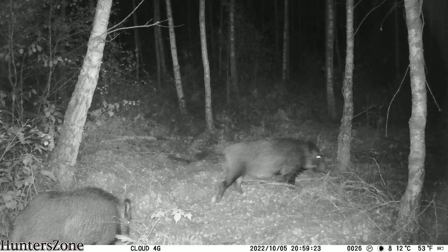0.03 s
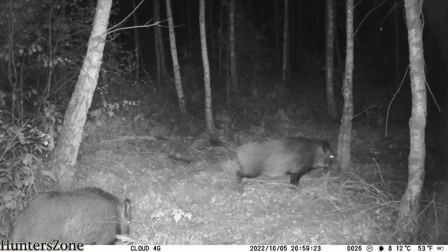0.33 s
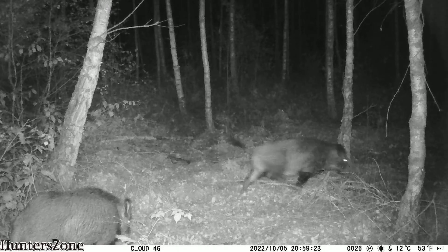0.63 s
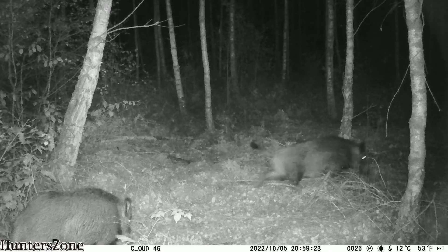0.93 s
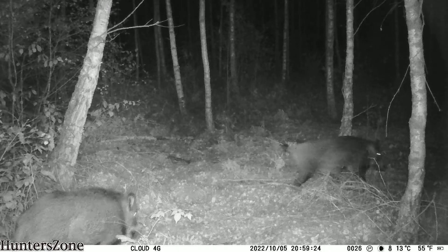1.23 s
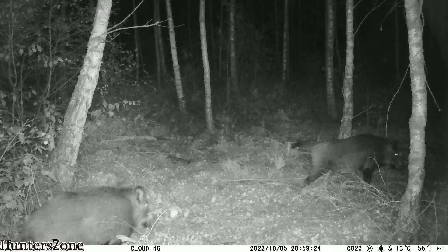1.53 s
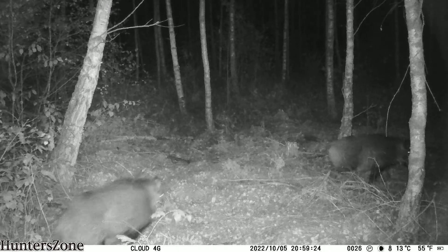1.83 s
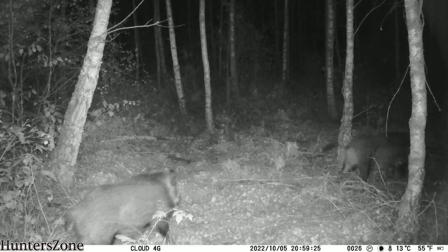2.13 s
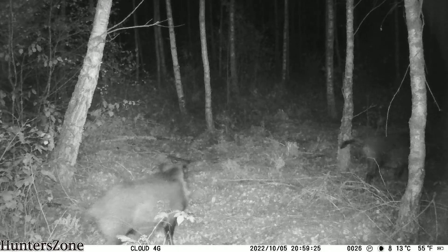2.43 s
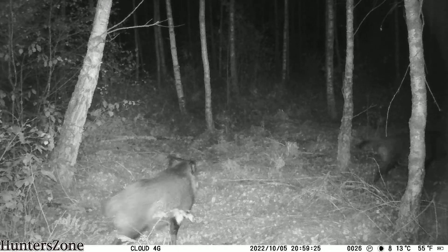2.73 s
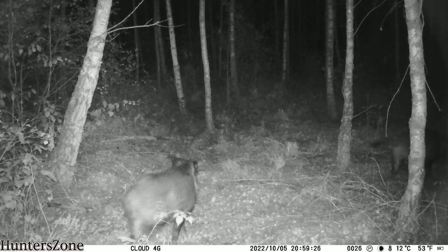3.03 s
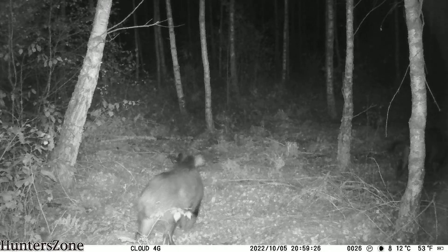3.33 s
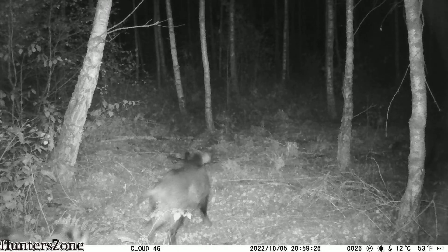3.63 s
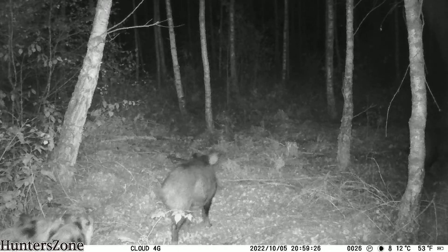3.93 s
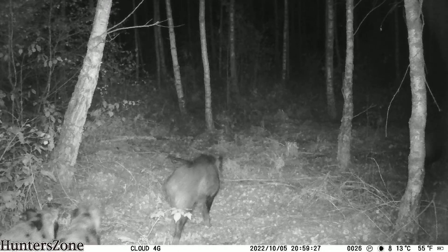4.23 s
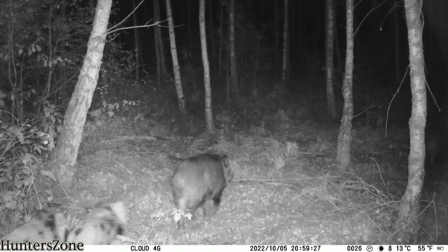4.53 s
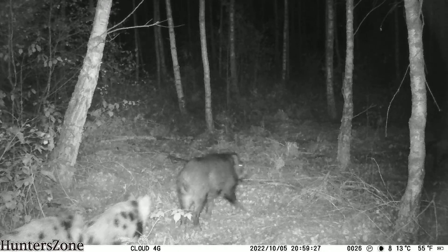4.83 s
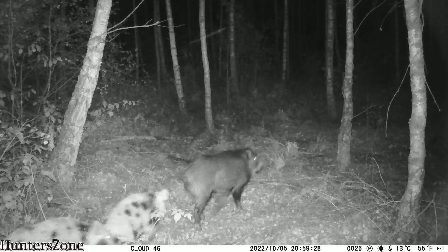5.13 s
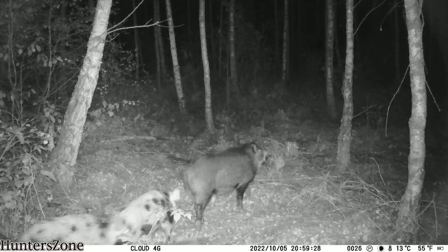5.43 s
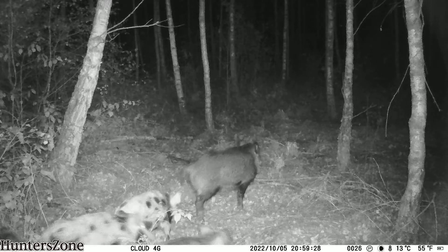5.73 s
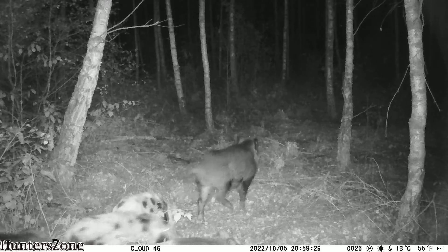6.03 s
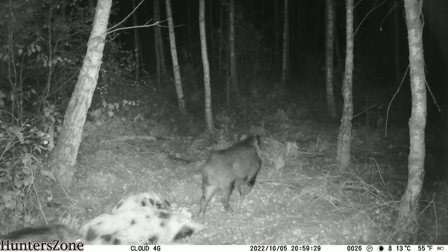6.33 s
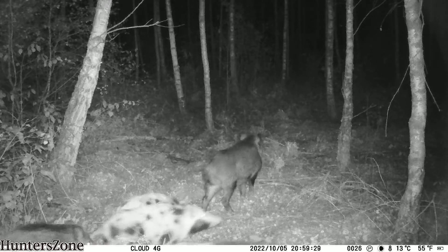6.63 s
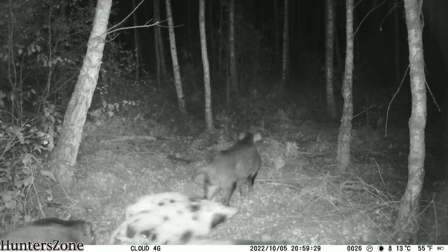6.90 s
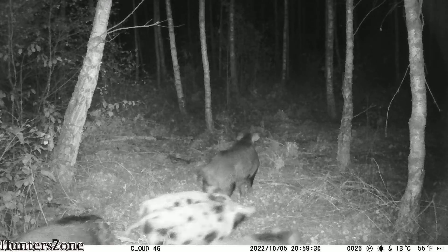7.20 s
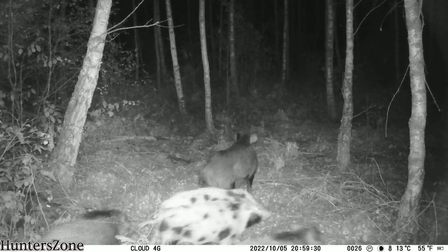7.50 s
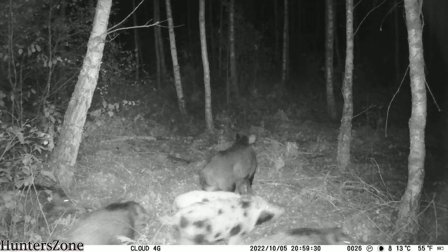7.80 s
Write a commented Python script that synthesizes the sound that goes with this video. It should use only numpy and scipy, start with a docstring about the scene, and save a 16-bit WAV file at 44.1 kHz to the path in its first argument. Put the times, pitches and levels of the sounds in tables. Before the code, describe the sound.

A faint wind rumble and the hush of a wood at night run throughout, with a thin microphone hiss. From the start, wild boars brush through dry litter in short, quiet, crackly rustles over a low murmur of light steps. Dull hoof thuds begin at about 1.2 seconds, and by far the loudest lands in a quick cluster at 1.8 seconds. More follow around 2.6, 3.4 and 4.4 seconds, then only a few soft ones. Twigs start snapping at about 2.3 seconds and continue irregularly, with clearer cracks near 3.4, 5.5 and 6.9 seconds and the sharpest at 7.6 seconds. The light steps thicken again around 8 seconds, with one more soft thud. The whole scene is quiet, heard through a small, dull, slightly hollow microphone close to the animals.

```python
"""A faint wind rumble, the hush of a wood at night, and legs brushing through dry litter: wild boars pass.
The litter crackles as a sum of tiny fractures, twigs snap as impulses that ring in the wood, and hooves
set the springy ground into damped oscillation, heard as low thuds over a murmur of lighter steps.
All of it passes through the resonant housing and the dull, hissy microphone of a small camera close by."""
import sys
import numpy as np
from scipy import signal
from scipy.fft import rfft, irfft
from scipy.io import wavfile

SR = 44100
rng = np.random.default_rng(int(sys.argv[2]) if len(sys.argv) > 2 else 0)


def master(y):
    """Save y as 16-bit WAV."""
    cut = np.clip(np.atleast_2d(y).T, -1, 1)
    pcm = np.round(cut * 32767)  # scale
    wavfile.write(sys.argv[1], SR, pcm.astype(np.int16))


N = 355446


def from_db(db):
    """Amplitude ratio of a level in decibels."""
    return 10 ** (np.asarray(db) / 20)


def rms_one(x):
    """Normalisation to rms 1."""
    return x / np.sqrt(np.mean(x ** 2) + 1e-20)


def seconds():
    """The time of every sample."""
    return np.arange(N) / SR


def coloured(x, spectrum):
    """Spectral shaping, falling 58 dB per octave beyond the ends of the table; rms 1."""
    hz, db = np.transpose(spectrum)
    octave, known = np.log2(np.fft.rfftfreq(N, 1 / SR) + 1), np.log2(hz)
    beyond = np.abs(octave - np.clip(octave, known[0], known[-1]))
    gain = from_db(np.interp(octave, known, db) - 58 * beyond)
    return rms_one(irfft(rfft(x) * gain, N))


def resonance(x, hz, width_hz):
    """A two-pole resonator with unit gain at its peak."""
    r = np.exp(-np.pi * width_hz / SR)
    feedback = [1, -2 * r * np.cos(2 * np.pi * hz / SR), r * r]
    return signal.lfilter(np.array([1, 0, -1]) * (1 - r * r) / 2, feedback, x)


def band(x, low_hz, high_hz):
    """Second-order band-pass."""
    return signal.sosfilt(signal.butter(2, [low_hz, high_hz], "band", fs=SR, output="sos"), x)


def drift(per_s):
    """A random wander of rms 1."""
    knots = np.arange(0, N / SR + 1, 1 / per_s)
    return rms_one(np.interp(seconds(), knots, rng.standard_normal(len(knots))))


def swell(centre_s, half_width_s):
    """A bell-shaped envelope, down to 1/e at its half-width."""
    return np.exp(-np.minimum(((seconds() - centre_s) / half_width_s) ** 2, 50))


def add(out, start_s, sound):
    """Superposition of a sound on out from start_s."""
    start = round(start_s * SR)
    out[start:start + len(sound)] += sound[:N - start]


def crackle(per_s, spread_db, clump_db):
    """Shot noise: tiny fractures are random impulses of uneven size, clumped by a wandering level."""
    sizes = from_db(spread_db * np.minimum(rng.exponential(1, N), 4)) * rng.choice([-1, 1], N)
    return sizes * (rng.random(N) < per_s / SR) * from_db(clump_db * drift(60))


# Spectra of the wind and of the wood's hush: f/Hz, relative level/dB
WIND_SPECTRUM = [(12, -1), (25, 3.5), (36, -6.5), (55, -12), (90, -12.5), (200, -9.5), (300, -34.5)]
HUSH_SPECTRUM = [(150, -29.5), (260, -1.5), (384, -4), (490, -5), (534, -3.5), (761, -4), (829, -2.5),
                 (902, -8), (995, -7), (1250, -5.5), (1850, -9.5), (2040, -10.5), (2910, -16), (3580, -18),
                 (4800, -35.5), (6240, -53.5), (10600, -120)]
def night_air(wind_db=-65, hush_db=-69.5, hiss_db=-84):
    """Stationary noise: wind rumble, the hush of the wood and a thin microphone hiss."""
    rumble, hush, hiss = rng.standard_normal((3, N))
    return (from_db(wind_db) * coloured(rumble, WIND_SPECTRUM)
            + from_db(hush_db) * coloured(hush, HUSH_SPECTRUM)
            + from_db(hiss_db) * rms_one(band(hiss, 5820, 7550)))


# Spectra of scuffed soil, crunching sticks and brushed leaves: f/Hz, relative level/dB
SOIL_SPECTRUM = [(200, 5), (270, -0.5), (360, -1.5), (550, -6.5), (750, -16)]
CRUNCH_SPECTRUM = [(210, -32.5), (350, -6.5), (417, -5.5), (481, -10), (599, -2.5), (698, -12), (928, 3),
                   (1010, -6), (1180, -6.5), (1470, 0), (1850, -4.5), (2510, -10.5), (4800, -28.5),
                   (6240, -59), (10600, -120)]
LEAF_SPECTRUM = [(2590, -49.5), (4400, -25.5), (4750, -21), (6020, -5.5), (7170, 1.5), (7540, 2),
                 (8030, -3), (8500, -15), (8700, -21), (11300, -46), (19100, -120)]
# Legs sweeping the litter: centre t/s, half-width/s, soil level/dB, crunch level/dB, leaf level/dB
LEG_SWEEPS = [(.32, 0.052, -84, -74.5, -77), (0.449, 0.014, -79, -62, -77), (0.996, .06, -80, -65, -79),
              (1.189, 0.022, -71, -59.5, -68.5), (1.485, 0.0046, -72, -67.5, -66),
              (1.576, 0.055, -81, -64.5, -79), (1.77, 0.021, -75, -60, -64.5),
              (2.172, 0.086, -82, -69, -78), (2.31, 0.029, -81, -69, -71.5),
              (2.409, 0.022, -76, -60.5, -71), (2.422, 0.0042, -83, -69, -63.5),
              (2.613, 0.016, -76, -62.5, -69.5), (2.767, 0.081, -76, -71.5, -82),
              (3.058, 0.047, -60.5, -60.5, -71.5), (3.67, 0.021, -72, -60.5, -67),
              (3.724, 0.015, -62.5, -75, -77), (4.08, .012, -58, -83, -90), (4.361, 0.016, -84, -64, -71.5),
              (4.431, 0.014, -71, -54.5, -63), (4.685, 0.028, -71, -63, -84),
              (5.122, 0.024, -81, -60.5, -78.5), (5.58, 0.046, -87, -68, -81),
              (6.166, 0.032, -69, -65.5, -72), (6.325, 0.054, -81, -69.5, -84),
              (6.863, 0.047, -78, -67, -74.5), (7.09, 0.031, -80, -67.5, -69.5),
              (7.882, 0.019, -80, -66, -79), (7.967, 0.01, -61, -64.5, -78)]
def litter(stir_db, mean_crunch_db=-72.5, crunch_db_per_db=0.39, leaf_offset_db=-2):
    """Incoherent sources add in power: each leg scuffs soil, crunches sticks and brushes dry leaves."""
    crunch_db = mean_crunch_db + crunch_db_per_db * (stir_db - stir_db.mean())
    powers = [np.zeros(N), from_db(crunch_db) ** 2, from_db(stir_db + leaf_offset_db) ** 2]
    for centre_s, half_width_s, *levels_db in LEG_SWEEPS:
        stroke = swell(centre_s, half_width_s)
        powers = [power + stroke * from_db(db) ** 2 for power, db in zip(powers, levels_db)]
    soil = coloured(crackle(per_s=2000, spread_db=6.0, clump_db=3.0), SOIL_SPECTRUM)
    sticks = coloured(crackle(per_s=2600, spread_db=3.0, clump_db=2.16), CRUNCH_SPECTRUM)
    leaves = coloured(crackle(per_s=2200, spread_db=2.5, clump_db=2.5), LEAF_SPECTRUM)
    return sum(np.sqrt(power) * grains for power, grains in zip(powers, (soil, sticks, leaves)))


# Spectrum of the ground under light steps: f/Hz, relative level/dB
TREAD_SPECTRUM = [(32, -34), (55, -3.5), (81, 1), (125, -1), (146, -8), (173, 0.5), (195, -4), (217, -14),
                  (259, -25), (388, -23.5), (450, -31), (580, -56.5), (990, -120)]
def light_treads(tread_db, offset_db=1, lag_s=0.038, half_width_s=0.032, over_crunch_db=2):
    """Overlapping impacts merge into a low murmur, which swells as each leg lands after its sweep."""
    landing_power = sum(from_db(crunch_db + over_crunch_db) ** 2 * swell(sweep_s + lag_s, half_width_s)
                        for sweep_s, _, _, crunch_db, _ in LEG_SWEEPS)
    murmur = coloured(crackle(per_s=300, spread_db=0.5, clump_db=2.5), TREAD_SPECTRUM)
    return np.sqrt(from_db(tread_db + offset_db) ** 2 + landing_power) * murmur


def small_cracks(stir_db, per_s=14, impulse_db=-43, spread_db=1.5, brittle_db=-2):
    """A random point process: thin sticks give way at a rate that rises as the litter is stirred."""
    breaks = rng.random(N) < per_s * from_db(stir_db - stir_db.mean()) / SR
    clicks = breaks * from_db(impulse_db + spread_db * np.minimum(rng.exponential(1, N), 3)) + 1e-18
    brittle = band(band(clicks, 6000, 8300), 6000, 8300)
    return band(clicks, 1100, 3000) + from_db(brittle_db) * brittle


# Snapping twigs: t/s, peak level/dB, resonance f/Hz, bandwidth/Hz, treble level/dB relative to the wood
TWIG_SNAPS = [(2.303, -50, 1300, 900, -12), (2.357, -52, 1500, 1000, -4), (2.389, -45, 2190, 900, -18),
              (3.427, -39, 1800, 1100, -18), (3.644, -49, 1450, 400, -12), (3.709, -46.5, 1750, 700, -14),
              (3.759, -53.5, 1300, 900, -22), (3.859, -48, 3350, 300, 5), (4.135, -55, 1700, 900, -12),
              (4.185, -49.5, 1490, 700, -11), (4.914, -55.5, 1600, 900, -9),
              (5.037, -48.5, 1500, 1100, -17), (5.051, -44.5, 1400, 500, -9.5),
              (5.382, -54, 2280, 1600, -20), (5.502, -39, 1820, 1680, -12), (5.778, -49, 2150, 1000, -24),
              (5.934, -44.5, 1610, 347, -30), (6.194, -47, 1550, 700, -20), (6.436, -49, 3030, 900, -12),
              (6.903, -42, 1440, 595, -26), (6.918, -48, 1470, 900, -20), (7.537, -55, 1300, 900, -18),
              (7.611, -34.5, 2320, 600, -12)]
def twigs(split_s=0.0017, splinter=0.099, scatter_db=-33, scatter_s=0.016, knock_hz=860, knock_s=0.0041):
    """Brittle fracture: an impulse and splinters ring the wood; trunks and litter scatter a short tail."""
    out, t = np.zeros(N), np.arange(SR // 10) / SR
    knock = np.sin(2 * np.pi * knock_hz * t) * (2 * t / knock_s) * np.exp(1 - 2 * t / knock_s)
    decay = splinter * np.exp(-t / split_s) + from_db(scatter_db) * np.exp(-t / scatter_s)
    for start_s, db, hz, width_hz, treble_db in TWIG_SNAPS:
        force = rng.standard_normal(len(t)) * decay
        force[0] += 1  # the break itself
        wood = band(resonance(force, hz, width_hz), 1100, 3060)
        edge = band(band(force, 5860, 8060), 5860, 8060)
        crack = wood / np.abs(wood).max() + from_db(treble_db) * edge / np.abs(edge).max()
        # thicker twigs sound lower and give more hollow knock, 16 dB per octave
        knock_db = -11 - 16 * np.log2(hz / 1420)
        crack += from_db(knock_db) * knock
        add(out, start_s, from_db(db) * crack / np.abs(crack).max())
    return out


# Overtones of the ground: frequency ratio to the fundamental, relative level/dB
GROUND_MODES = [(1.449, -21.5), (2.05, -19.5), (3.2, -29.5)]
# Heavy hoof falls: t/s, level/dB, ground fundamental f/Hz, hold time/s
HOOF_THUDS = [(1.189, -39, 143, .019), (1.210, -44, 181, 0.03), (1.256, -52, 177, 0.024),
              (1.732, -36.5, 182, 0.035), (1.804, -21.5, 178.6, 0.034), (1.848, -34.5, 183, 0.031),
              (2.172, -50, 218, 0.025), (2.22, -45, 113, 0.011), (2.354, -46, 126, 0.023),
              (2.385, -47, 109.6, .067), (2.612, -34.5, 159, 0.029), (2.642, -38, 162, 0.023),
              (3.105, -48.5, 189, 0.042), (3.14, -49.5, 123, 0.033), (3.44, -41.5, 167, 0.029),
              (3.466, -47, 99, .057), (3.72, -54, 149, 0.03), (3.97, -53.5, 114, 0.057),
              (4.212, -54, 174, 0.063), (4.433, -45.5, 163, .019), (4.455, -42.5, 121, 0.048),
              (5.106, -48, 117, 0.033), (5.44, -52, 129, 0.039), (6.895, -51.5, 158, 0.069),
              (7.968, -48.5, 181, 0.083)]
def hoof_falls(sag=0.081, settle_s=0.012, rise_share=0.25, steepness=2.8,
               tail_db=-24, tail_s=0.053, soften=0.38, grit_s=0.02):
    """Damped oscillation of a stiffening spring: the ground's pitch rises as it takes a hoof's weight."""
    out, t = np.zeros(N), np.arange(SR // 4) / SR
    median_db = np.median(np.array(HOOF_THUDS)[:, 1])
    for start_s, db, hz, hold_s in HOOF_THUDS:
        rise = np.sin(np.pi / 2 * np.minimum(t / (rise_share * hold_s), 1)) ** 2
        load = rise * np.exp(-(t / hold_s) ** steepness)
        pitch_hz = hz * (1 - sag * np.exp(-t / settle_s))
        swing = load * np.sin(2 * np.pi * np.cumsum(pitch_hz) / SR)
        grit = sum(from_db(mode_db) * rms_one(resonance(rng.standard_normal(len(t)), hz * ratio, 41))
                   for ratio, mode_db in GROUND_MODES)
        # overtones mark first contact; their share falls for faint treads and for heavy ones that sink in
        contact = band(grit * np.exp(-(t / grit_s) ** 2), 180, 550)
        contact *= from_db(-soften * abs(db - median_db))
        shudder = rms_one(band(rng.standard_normal(len(t)), 96, 190))
        shudder *= np.minimum(t / hold_s, 1) * np.exp(-t / tail_s)
        add(out, start_s, from_db(db) * (swing + contact + from_db(tail_db) * shudder))
    return out


# Activity of the herd underfoot: t/s, light-step level/dB, leaf-stirring level/dB
HERD_ACTIVITY = [(0.0, -65.5, -81.5), (0.45, -67, -78.5), (0.67, -66.5, -84), (1.64, -63, -75.5),
                 (2.13, -64.5, -75.5), (2.38, -58.5, -77), (3.39, -61, -76), (4.22, -59.5, -77.5),
                 (5.93, -65.5, -83.5), (7.16, -61, -80.5), (7.65, -65, -78.5), (8.06, -56.5, -80)]
def scene():
    """Linear superposition: the sounds of the passing herd add to those of the still wood."""
    times_s, *levels_db = np.transpose(HERD_ACTIVITY)
    tread_db, stir_db = [np.interp(seconds(), times_s, db) for db in levels_db]
    herd = hoof_falls() + light_treads(tread_db) + twigs() + small_cracks(stir_db) + litter(stir_db)
    return (herd + night_air())[None]


# Hollow resonances of the camera housing: f/Hz, bandwidth/Hz, gain/dB
HOUSING_MODES = [(343, 12, 3), (883, 110, 1), (1410, 160, 1.5)]
def record(dry, cutoff_hz=8650):
    """Cavity resonance in the housing lifts three narrow bands; a steep low-pass dulls the top."""
    ringing = sum((from_db(db) - 1) * resonance(dry, hz, width_hz) for hz, width_hz, db in HOUSING_MODES)
    low_pass = signal.ellip(10, .3, 70, cutoff_hz, fs=SR, output="sos")
    return signal.sosfilt(low_pass, dry + ringing)


dry = scene()
out = record(dry)
master(out)
```